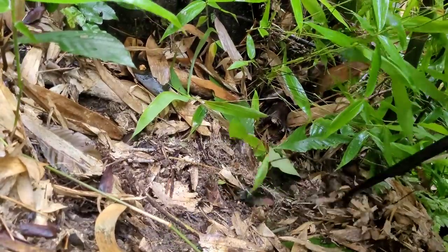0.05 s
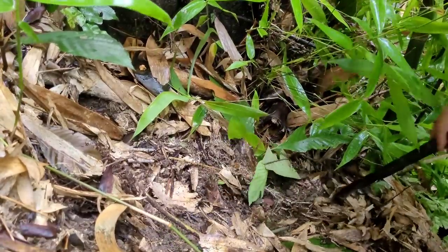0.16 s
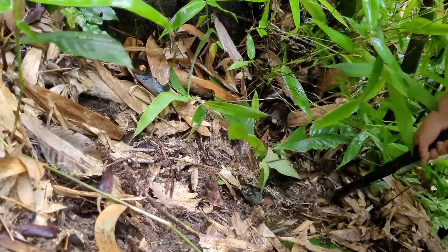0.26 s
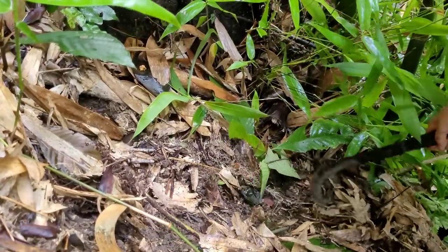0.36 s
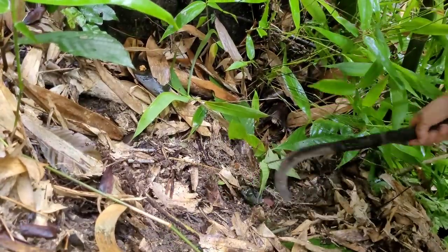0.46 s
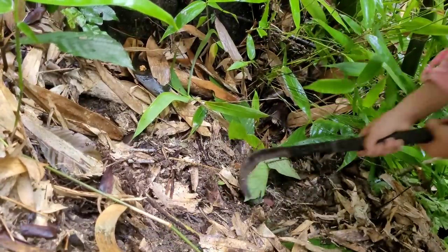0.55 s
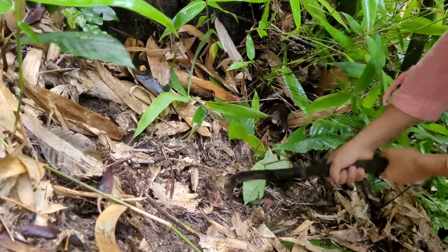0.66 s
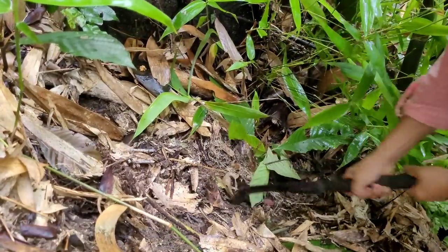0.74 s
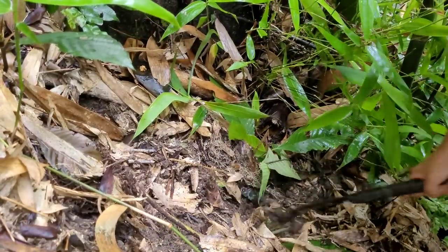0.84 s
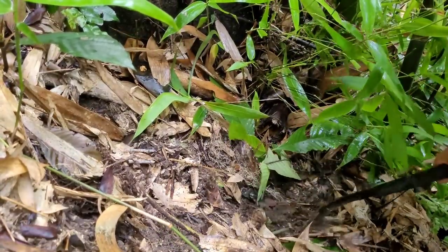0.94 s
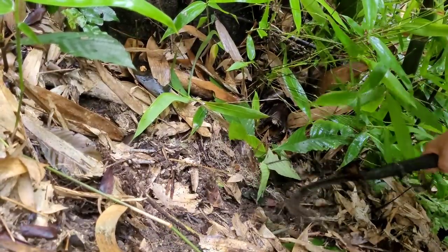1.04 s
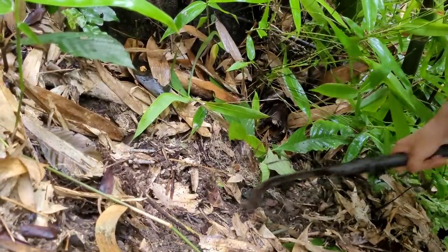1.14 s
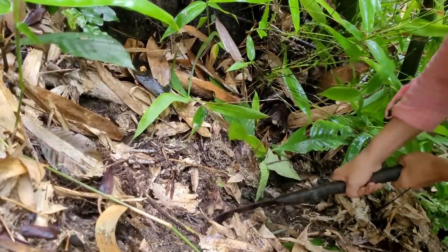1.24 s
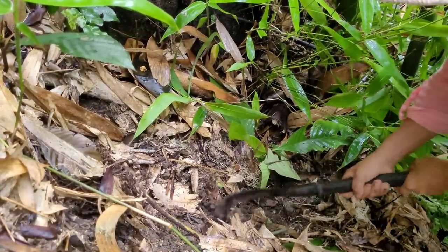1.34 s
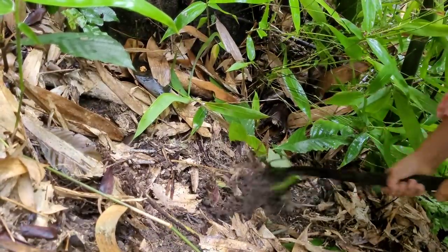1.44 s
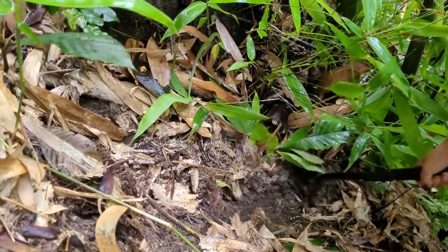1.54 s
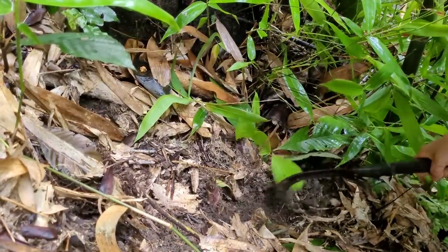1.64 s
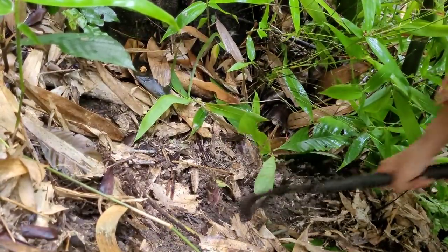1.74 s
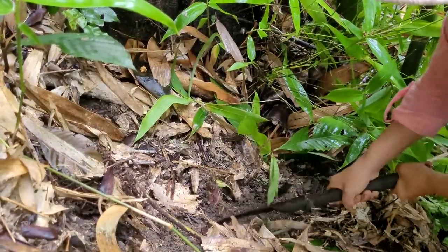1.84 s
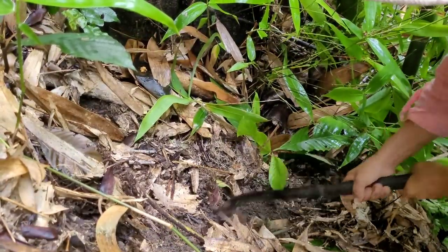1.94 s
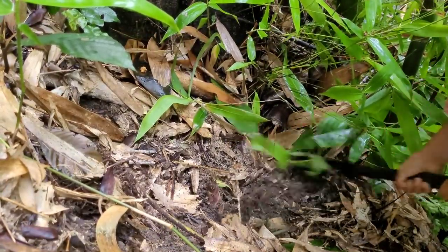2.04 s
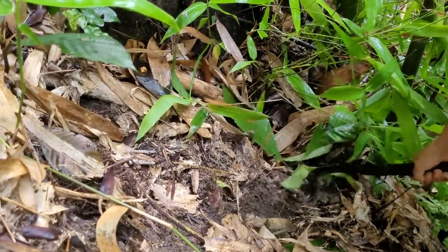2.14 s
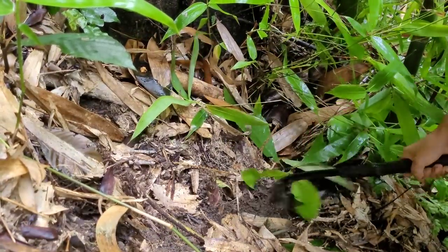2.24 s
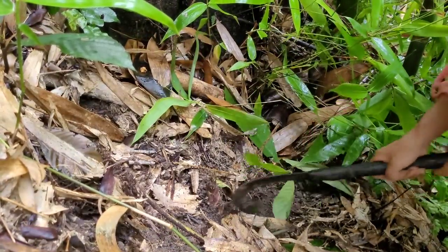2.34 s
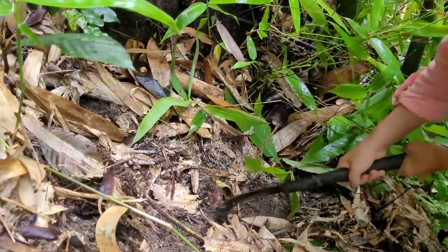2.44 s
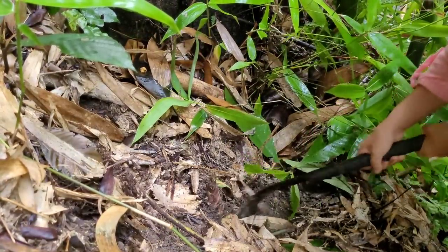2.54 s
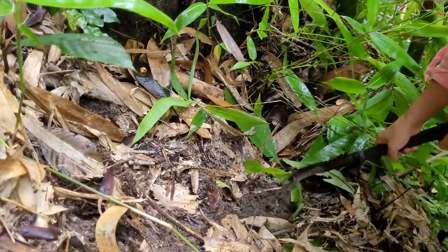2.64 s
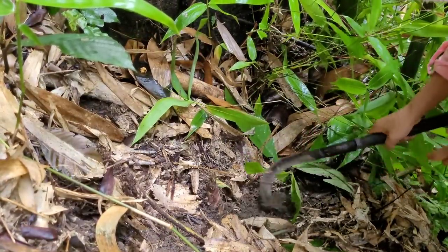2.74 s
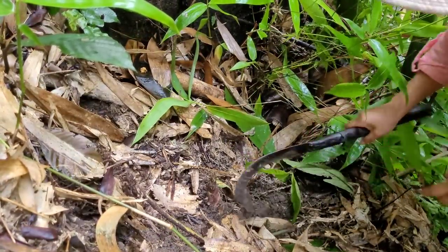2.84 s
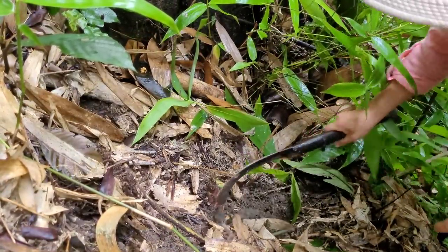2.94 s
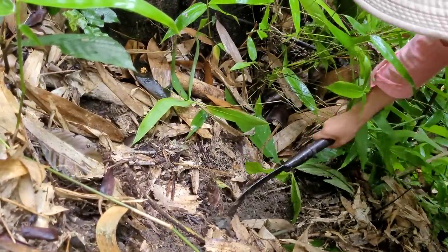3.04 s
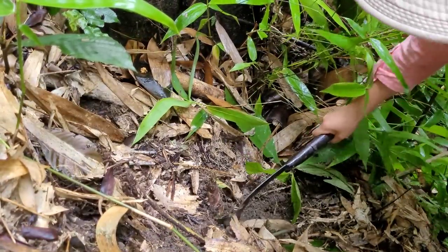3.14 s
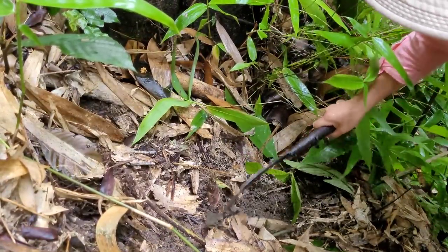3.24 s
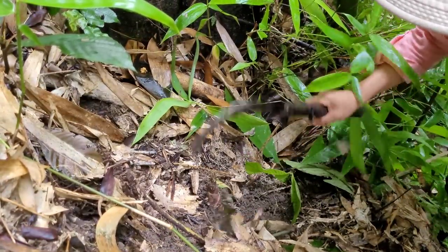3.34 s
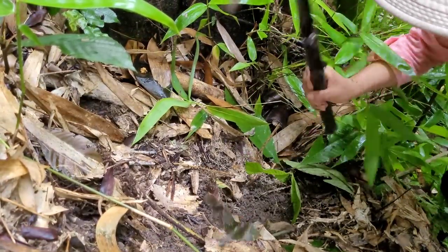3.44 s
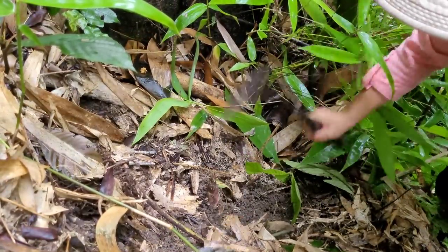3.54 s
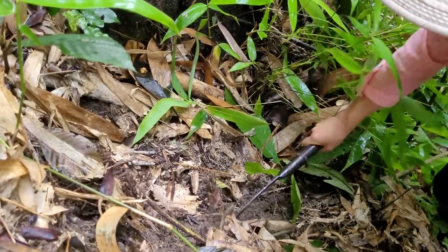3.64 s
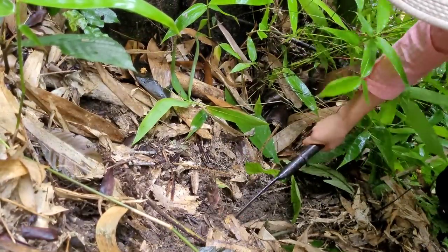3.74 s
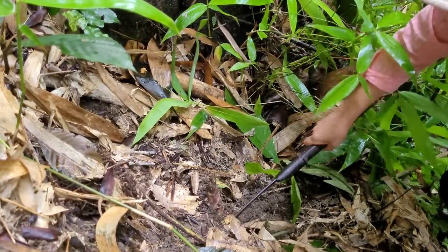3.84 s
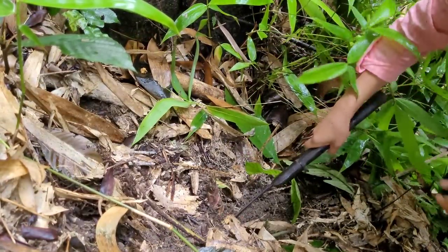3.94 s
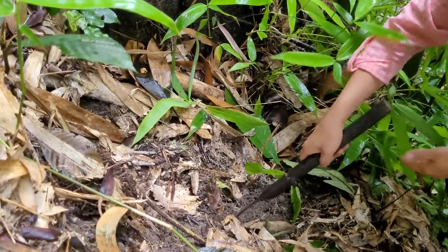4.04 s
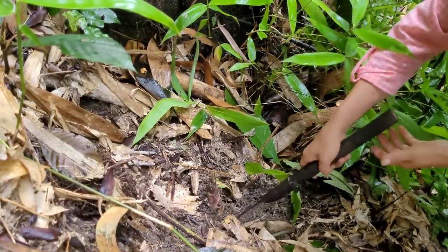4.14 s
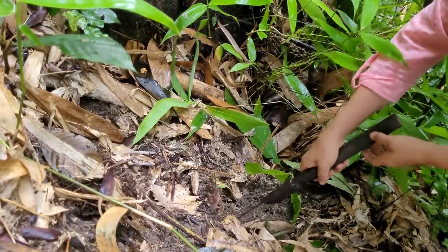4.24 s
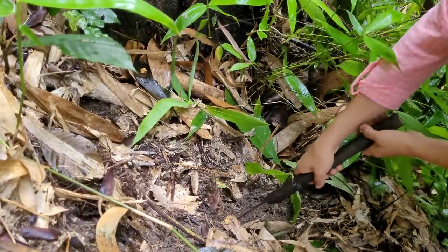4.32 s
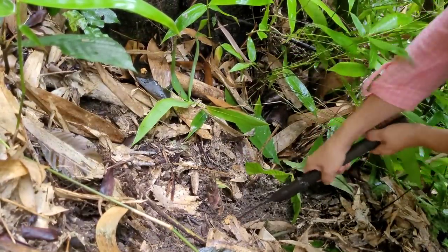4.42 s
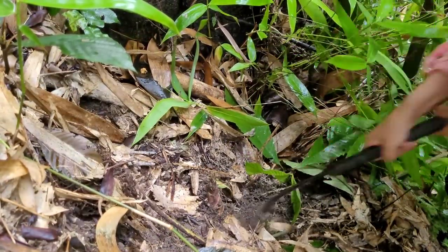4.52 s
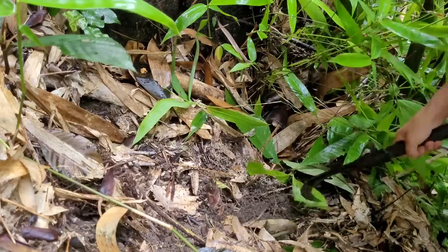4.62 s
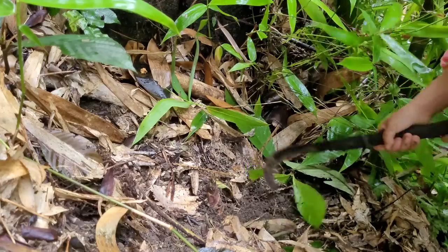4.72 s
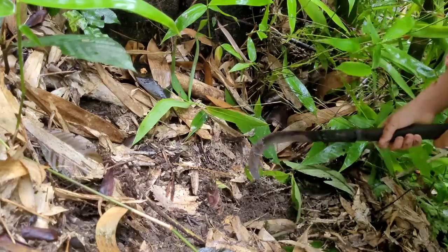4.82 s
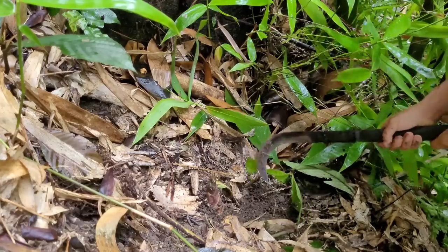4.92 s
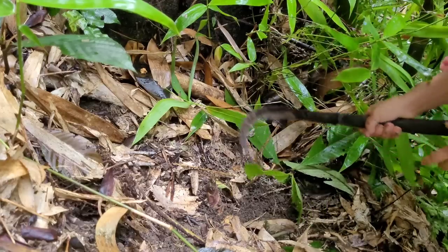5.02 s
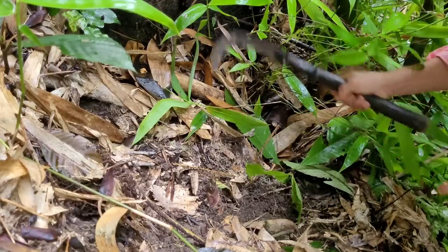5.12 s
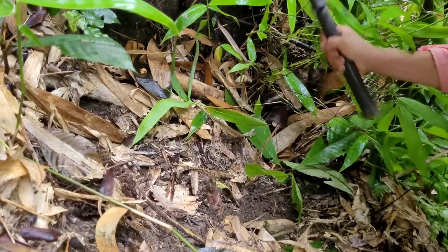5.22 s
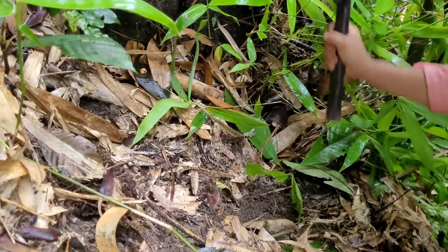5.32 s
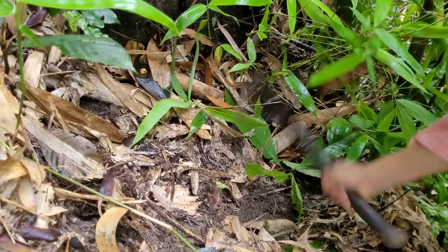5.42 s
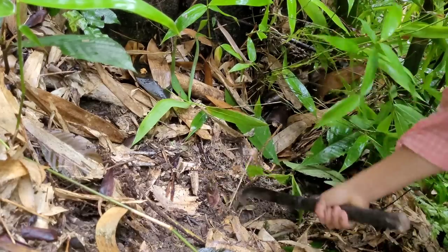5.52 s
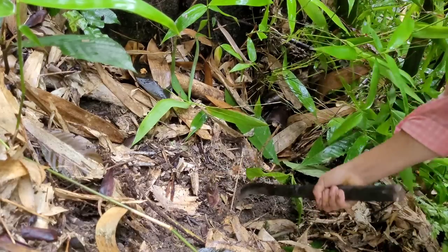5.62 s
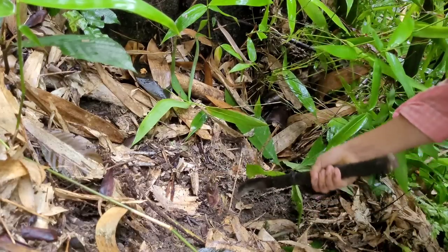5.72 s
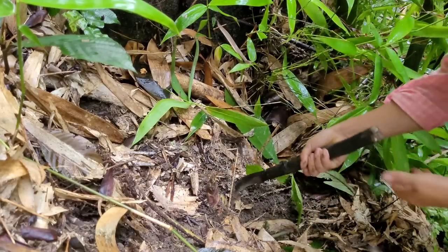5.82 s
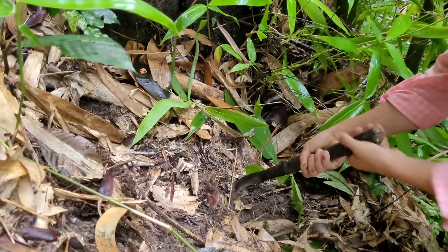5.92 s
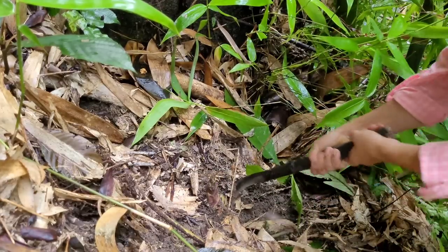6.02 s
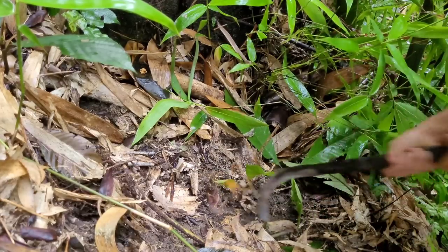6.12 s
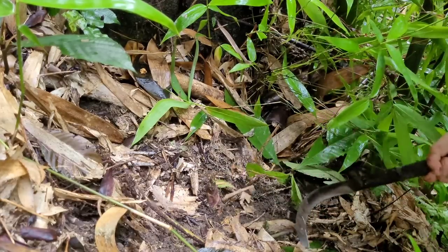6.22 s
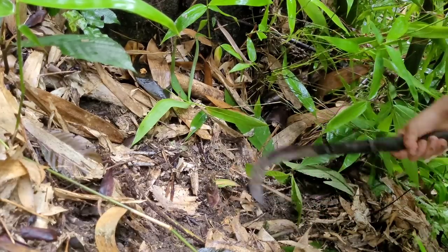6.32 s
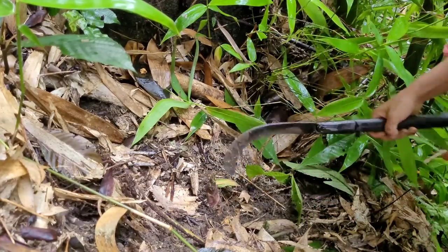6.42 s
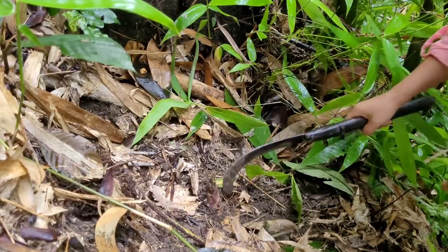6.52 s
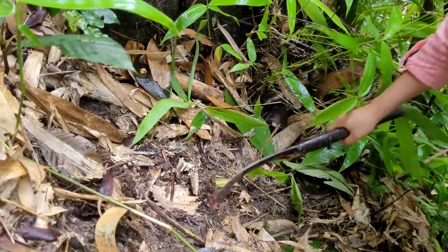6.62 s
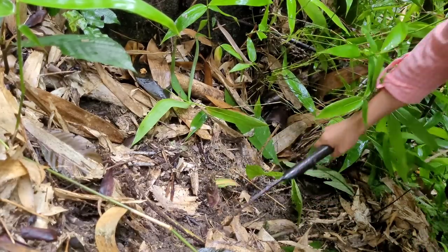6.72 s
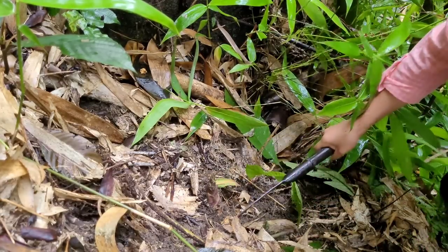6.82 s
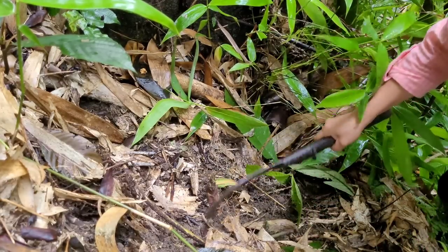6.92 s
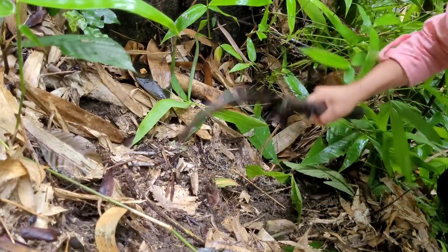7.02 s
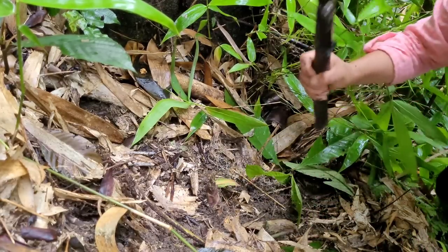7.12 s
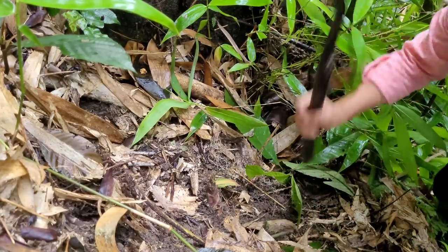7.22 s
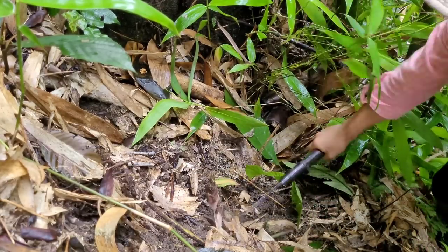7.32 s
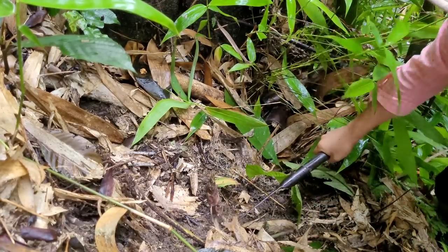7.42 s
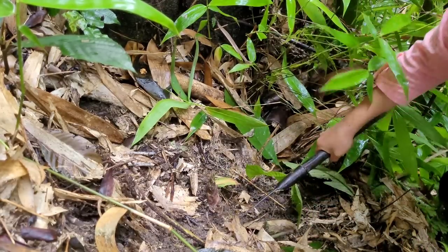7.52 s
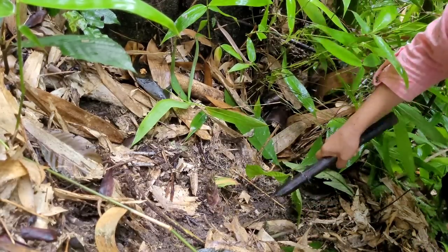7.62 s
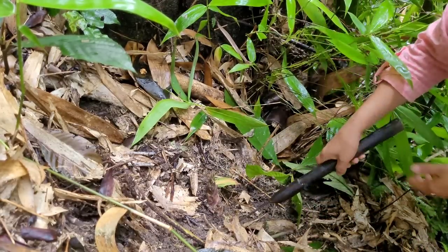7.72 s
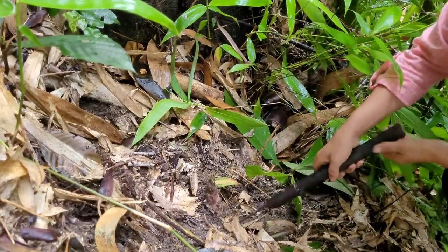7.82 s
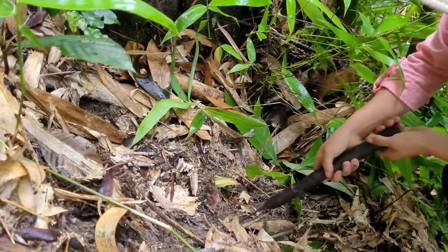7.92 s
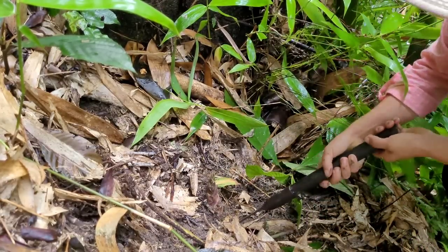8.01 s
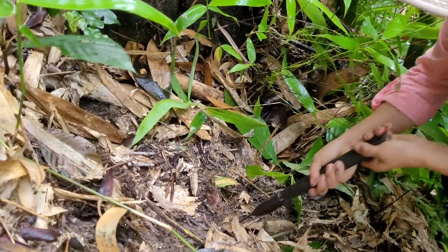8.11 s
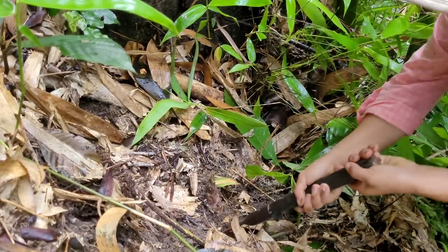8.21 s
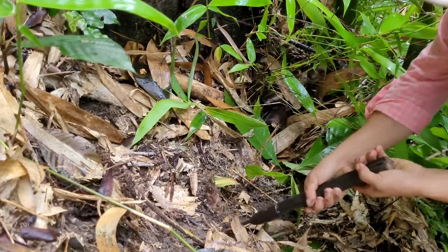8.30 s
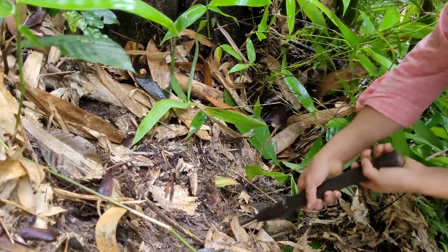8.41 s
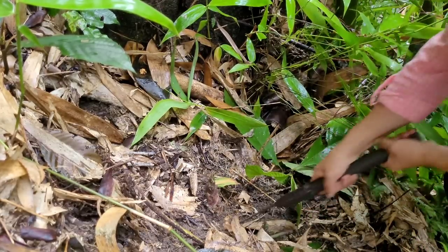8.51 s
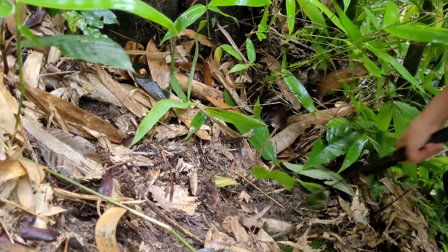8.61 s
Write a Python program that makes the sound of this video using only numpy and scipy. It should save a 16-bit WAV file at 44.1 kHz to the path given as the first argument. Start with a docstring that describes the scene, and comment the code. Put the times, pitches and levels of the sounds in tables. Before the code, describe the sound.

Close, dry outdoor sound of a hooked machete in damp soil and leaf litter. From 0 to 1.7 s there are light rustling cuts, a cluster of twig snaps and a dull handle bump near 0.7-0.9, and small scrapes at 1.3 and 1.6. Soft earthy chops thump at 1.9 and 2.5, with a sharp snap and rake at 2.1. Firmer blows follow at 3.1 and 3.7, then a crackling drag around 4 and a slower gritty cut at 4.5. After a lull and a bump at 5.3, a hard bright crunch lands at 5.5. Duller cuts come at 6.1 and 6.8 with faint steel taps; the heaviest crunch is at 7.4. Gritty drags and snaps run 7.6-8.3, with a last soft cut at 8.6. Throughout, thin high insect hiss and low forest rush stay faint; distant bird whistles glide near 3.5-4 and, weaker, at 6.4.

```python
"""Machete in forest soil

A hooked machete chops into damp soil close by: grit crunches, roots knock and the ground thumps.
Between blows it lightly cuts and rakes crackling leaf litter, twigs snap and the handle bumps. All this
is noise shaped by forces, struck resonances and damped modes. Behind it insects hiss in a high band of
noise, the forest rushes low and a far bird whistles in gliding tones smeared by a dense echo.
"""
import sys
import numpy as np
from scipy import signal
from scipy.fft import rfft, irfft, next_fast_len
from scipy.io import wavfile

SR = 44100
rng = np.random.default_rng(int(sys.argv[2]) if len(sys.argv) > 2 else 0)


def store_pcm(level_fs):
    """Save levels as 16-bit WAV."""
    pcm = np.round(np.clip(level_fs, -1, 1) * 32767).astype(np.int16)
    wavfile.write(sys.argv[1], SR, np.atleast_2d(pcm).T)


N = 381906
TIME = np.arange(N) / SR   # s

# near sounds, left-right correlation, clipped to -0.9..0.999: (frequency [Hz], correlation [1])
NEAR_LIKENESS = [(60, -0.1), (130, 2.1), (250, 0.7), (500, 1), (1000, 0.74), (2000, 0.5), (5000, -0.08),
                 (15000, 0.17)]
# near sounds, lean to the left: (frequency [Hz], left minus right [dB])
NEAR_BALANCE = [(200, 0), (550, -1), (780, -4), (1000, 2.5), (1250, -5.5), (2100, 0), (3000, 1), (4600, 1),
                (7000, -5), (10000, 2.5), (14000, 2)]
# colour of clods: (frequency [Hz], relative density [dB])
CLOD_SPECTRUM = [(110, -1), (210, -10), (450, -1.5), (750, 2), (1000, -15), (1600, -11), (3000, -85)]
# colour of grit: (frequency [Hz], relative density [dB])
GRIT_SPECTRUM = [(450, -57), (850, -12.5), (1050, 4.5), (1250, -6), (1750, 5.5), (2600, -2), (3500, -6),
                 (5000, -6), (9000, -24)]
# colour of dry leaves: (frequency [Hz], relative density [dB])
LEAF_SPECTRUM = [(800, -48), (2000, -3.5), (3000, -4.5), (4500, 2.5), (7500, 4), (11000, 3.5), (14500, 1.5),
                 (16000, -1)]
# blows of the blade: (time [s], entry [s], travel [s], stop t60 [s], clod level [dB], grit level [dB],
#   leaf level [dB], leaf top-treble gain [dB], ring pitch [Hz], ring level [dB], heave level [dB],
#   thud level [dB], root knock mid pitch [Hz], root knock level [dB])
BLOWS = [(1.872, 0.0067, 0.028, 0.034, -33, -35, -31.5, -1.5, 780, -35, -27, -22, 483, -25),
         (2.514, 0.0019, 0.0044, 0.024, -30, -40, -35.5, -1, 1630, -36, -28, -18.5, 357, -26),
         (3.124, 0.002, 0.0027, 0.025, -24, -29, -25, 4.5, 1040, -29, -30.5, -25, 275, -34),
         (3.6797, 0.0032, 0.0055, 0.04, -19, -17.5, -13.5, -1, 1970, -33, -25.5, -21, 328, -15.5),
         (4.546, .011, .02, 0.065, -30, -23.5, -24, 2.5, 980, -35, -33.5, -82, 690, -40),
         (5.5427, 0.001, 0.005, 0.0073, -16.5, -15.5, -7, 7.5, 1740, -20, -22.5, -28, 377, -13.5),
         (6.146, 0.018, 0.029, 0.068, -33, -29.5, -20.5, -3.5, 780, -45, -40.5, -41.5, 782, -28.5),
         (6.829, 0.0047, 0.0079, 0.051, -35, -39, -34, -7, 985, -41, -40.5, -42, 476, -26.5),
         (7.376, 0.002, 0.0062, 0.062, -15.5, -10, -11, -2, 1660, -41, -22, -24, 201, -26),
         (8.602, 0.012, .016, .11, -34, -26, -23.5, -5.5, 1350, -34, -41, -63.5, 475, -45)]


def chops(sag_db=7.0, ring_q=28.0, sheen_hz=9000):
    """The edge enters the litter, slows through clods and grit, and stops; crumbs fall after it."""
    texture = fractures(per_s=2700, spread_db=0.0, ring_s=0.00054, bed=0.66)
    clod = near_noise(CLOD_SPECTRUM, texture)
    grit = near_noise(GRIT_SPECTRUM, texture)
    leaf = near_noise(LEAF_SPECTRUM, texture)
    sheen = signal.sosfiltfilt(signal.butter(2, sheen_hz, "high", fs=SR, output="sos"), leaf)
    crumbs = fractures(per_s=400, spread_db=2.0, ring_s=.001, bed=.3)
    out = np.zeros((2, N))
    for s, entry_s, travel_s, t60, clod_db, grit_db, leaf_db, sheen_db, ring_hz, ring_db, *_ in BLOWS:
        span = slice(int((s - .08) * SR), int((s + .25) * SR))
        t = TIME[span] - s
        entry_db = 20 * np.minimum(t, 0) / entry_s
        slowing_db = sag_db * np.clip(t / travel_s, 0, 1)
        stop_db = 60 * np.maximum(t - travel_s, 0) / t60
        force = from_db(entry_db - slowing_db - stop_db)
        force = force * np.where(t > travel_s, crumbs[span], 1)
        # the buried blade rings at a pitch set by how the soil grips it
        ring = signal.lfilter(*signal.iirpeak(ring_hz, ring_q, fs=SR), grit[:, span])
        # drier leaves tear with more of the highest treble
        tear = leaf[:, span] + (from_db(sheen_db) - 1) * sheen[:, span]
        layers = [(clod[:, span], clod_db), (grit[:, span], grit_db), (ring, ring_db), (tear, leaf_db)]
        for sound, level_db in layers:
            out[:, span] += driven(sound, force) * from_db(level_db)
    return out


# heave, then thud of the ground: (mid pitch [Hz], swell [s])
GROUND_MODES = [(78, 0.0097), (128, 0.006)]
# colour of moving earth: (frequency [Hz], relative density [dB])
EARTH_SPECTRUM = [(20, -33.5), (33, -19.5), (50, 3.5), (85, -5.5), (130, -7.5), (220, -15), (400, -24),
                  (900, -39)]
# left-right correlation of moving earth: (frequency [Hz], correlation [1])
EARTH_LIKENESS = [(30, .9), (100, .96)]
GROUND_LAG_S = 0.00074   # the earth gives just after the edge bites
SETTLE_DB, SETTLE_T60_S = -2, 0.18   # level relative to the heave


def ground(knock_swell_s=0.0032, droop=0.13, knock_droop=0.097, settle_start_s=.012):
    """Springy earth heaves under each blow while a root knocks, then the loose soil settles."""
    out = np.zeros((2, N))
    earth = noise(EARTH_SPECTRUM, EARTH_LIKENESS, NEAR_BALANCE)
    for s, *_, heave_db, thud_db, knock_hz, knock_db in BLOWS:
        heave = thump(*GROUND_MODES[0], heave_db, droop)
        thud = thump(*GROUND_MODES[1], thud_db, droop)
        add(out, s + GROUND_LAG_S, heave - thud)
        add(out, s + GROUND_LAG_S, thump(knock_hz, knock_swell_s, knock_db, knock_droop))
        settling = swell(s + settle_start_s, settle_start_s / 2, SETTLE_T60_S)
        out += from_db(heave_db + SETTLE_DB) * driven(earth, settling)
    return out


# stones catching on the edge: (frequency [Hz], relative density [dB])
CATCH_SPECTRUM = [(250, -33), (500, -2.5), (800, -4.5), (1100, -3), (1800, -3), (3000, -8.5), (6000, -10)]
KNOCK_DB = -3   # crumb knocks, relative to the soil


def raking(leaf_trim_db=1.5, blade_db=-4.0):
    """Crumbs and dry leaves crackle against the moving blade, and stones catching on it make it ring."""
    soil, leaf = litter(fractures(per_s=500, spread_db=3.0, ring_s=.001, bed=.5))
    catches = near_noise(CATCH_SPECTRUM, fractures(per_s=130, spread_db=2.2, ring_s=.001, bed=.05))
    ringing = from_db(blade_db) * blade_ring(catches)
    soil = rms_one(soil + ringing + from_db(KNOCK_DB) * crumb_knocks())
    soil_force, leaf_force = stirring()
    return soil * soil_force + leaf * leaf_force * from_db(leaf_trim_db)


# light cuts and sweeps through the litter, leaf level before trim:
# (peak time [s], swell [s], fade t60 [s], soil level [dB], leaf level [dB])
CUTS_AND_SWEEPS = [(.02, 0.3, 0.57, -45, -46), (.18, 0.037, 0.23, -45, -44), (.3, .1, 1.2, -57.5, -55),
                   (.732, 0.096, 0.33, -41, -43.5), (.825, 0.085, 0.51, -44, -42),
                   (0.894, 0.096, 0.51, -44, -45), (1.1, .15, 3.2, -60, -60), (1.3, 0.019, 0.1, -36.5, -35),
                   (1.47, 0.12, 0.16, -78, -53), (1.57, 0.094, 0.36, -38.5, -41),
                   (2.06, 0.034, 0.08, -49, -42.5), (2.136, 0.037, 0.38, -31.5, -36.5),
                   (2.594, 0.035, 0.05, -60, -44), (2.646, 0.025, 0.38, -50, -49.5),
                   (2.89, 0.044, 1.2, -58, -48.5), (3.46, 0.09, 1.1, -66, -52.5),
                   (5.03, 0.094, 1.5, -65, -61), (5.301, 0.085, 0.26, -46.5, -43),
                   (5.49, 0.24, 0.35, -56.5, -54.5), (5.81, 0.14, 0.35, -58, -57),
                   (6.64, 0.048, 0.14, -51, -56.5), (6.75, 0.18, 1.6, -65, -56.5),
                   (7.044, 0.043, 0.22, -54.5, -43), (8.0, 0.034, 0.62, -48, -49),
                   (8.51, 0.072, 0.18, -53.5, -56)]
# drags through the soil, leaf level before trim:
# (start [s], stop [s], soil level [dB], leaf level [dB], unused [dB], unused [dB])
DRAGS = [(3.907, 4.137, -40.5, -40, -43, -58), (7.55, 7.877, -46, -49, -48, -36),
         (8.129, 8.255, -34, -36, -34, -60)]
# crumbs raining after a blow: leaf level before trim at mean grit, share of the grit's swing
SHOWER_DB, SHOWER_FOLLOWS, SHOWER_T60_S = -53, 0.32, 1
SHOWER_SOIL_DB = -1.5   # relative to SHOWER_DB


def stirring(shower_delay_s=0.017):
    """How hard light cuts, sweeps, drags and the crumbs raining after each blow stir soil and leaves."""
    moves = []
    for s, rise_s, t60, soil_db, leaf_db in CUTS_AND_SWEEPS:
        moves.append((swell(s, rise_s, t60), soil_db, leaf_db))
    for start_s, stop_s, soil_db, leaf_db, *_ in DRAGS:
        moves.append((effort(start_s, stop_s), soil_db, leaf_db))
    times, _, _, _, _, grit_db, *_ = np.transpose(BLOWS)
    showers_db = SHOWER_DB + SHOWER_FOLLOWS * (grit_db - grit_db.mean())
    for s, db in zip(times, showers_db):
        shower = swell(s + shower_delay_s, shower_delay_s / 2, SHOWER_T60_S)
        moves.append((shower, db + SHOWER_SOIL_DB, db))
    soil = np.sqrt(sum((shape * from_db(db)) ** 2 for shape, db, _ in moves))
    leaf = np.sqrt(sum((shape * from_db(db)) ** 2 for shape, _, db in moves))
    return soil, leaf


DRAG_BUILD_SHARE, DRAG_BUILD_DB, DRAG_RELEASE_T60_S = 0.78, 10.5, 0.082
DRAG_GRIP_S = 0.019   # the edge takes hold just before the pull


def effort(start_s, stop_s):
    """Force of a drag: it builds, holds, and falls quickly when the earth lets go."""
    built = np.clip((TIME - start_s) / (DRAG_BUILD_SHARE * (stop_s - start_s)), 0, 1)
    release_db = 60 * np.clip(TIME - stop_s, 0, 1) / DRAG_RELEASE_T60_S
    grip = np.clip((TIME - start_s) / DRAG_GRIP_S + 1, 0, 1)
    return from_db(DRAG_BUILD_DB * (built - 1) - release_db) * grip


KNOCKS_PER_S, KNOCK_SPREAD_DB = 260, 3.5
KNOCK_CYCLES = 14   # cycles to fall 60 dB
KNOCK_LOW_HZ, KNOCK_HIGH_HZ = 518, 3100


def crumb_knocks(count=18):
    """Crumbs and splinters knock together, each a short damped ring with its own size, pitch and place."""
    sizes = from_db(KNOCK_SPREAD_DB * np.minimum(rng.exponential(1, N), 3))
    sizes = (rng.random(N) < KNOCKS_PER_S / SR) * sizes
    clicks = sizes * (1 + .4 * rng.standard_normal((2, N)))
    dealt = rng.integers(0, count, N)   # which pitch each click gets
    out = 0
    for k, hz in enumerate(np.geomspace(KNOCK_LOW_HZ, KNOCK_HIGH_HZ, count)):
        radius = from_db(-60 * hz / (KNOCK_CYCLES * SR))
        turn = radius * np.cos(2 * np.pi * hz / SR)
        struck = clicks * (dealt == k) + 1e-18
        out = out + signal.lfilter([1, -turn], [1, -2 * turn, radius ** 2], struck)
    return rms_one(out)


# stalks and twigs snapping: (time [s], body level [dB], crack level [dB])
SNAPS = [(0.082, -40, -46), (.43, -68.5, -45), (0.722, -41, -36), (.811, -35.5, -37), (0.85, -37, -38),
         (.885, -38, -33), (0.897, -33.5, -29), (0.938, -55, -39), (1.148, -50.5, -39), (1.212, -43, -47),
         (1.292, -43, -39), (2.012, -41.5, -44), (2.1155, -31.5, -14.5), (2.348, -55, -39),
         (3.66, -38, -34), (3.668, -28, -31), (3.88, -46, -37), (3.903, -40, -41), (3.963, -42, -40),
         (3.97, -44, -46), (3.993, -38, -46), (4.014, -34, -38), (4.059, -29, -37), (4.518, -55, -39),
         (4.566, -33, -22), (4.59, -58, -30.5), (5.436, -40.5, -59), (5.538, -26.5, -23), (5.754, -57, -41),
         (5.809, -41, -36.5), (5.817, -41, -38.5), (6.184, -26.5, -20.5), (7.388, -19.5, -14),
         (7.702, -35.5, -42), (7.804, -39, -42), (7.977, -44, -42), (7.995, -36, -37), (8.024, -36, -37),
         (8.05, -37, -38), (8.158, -29, -36)]


def snaps(t60=0.031):
    """A stalk gives at once and its splinters die away."""
    soil, leaf = litter(fractures(per_s=3000, spread_db=2.5, ring_s=.0003, bed=.4))
    out = np.zeros((2, N))
    decay = from_db(-60 * TIME[:SR // 8] / t60)
    for s, body_db, crack_db in SNAPS:
        span = slice(int(s * SR), int(s * SR) + len(decay))
        out[:, span] += driven(soil[:, span], decay) * from_db(body_db)
        out[:, span] += driven(leaf[:, span], decay) * from_db(crack_db)
    return out


# colour of soil: (frequency [Hz], relative density [dB])
SOIL_SPECTRUM = [(100, 5), (220, 8.5), (400, 5.5), (750, -7), (1200, -1.5), (1900, -11), (2800, -9.5),
                 (4500, -2.5), (9000, -51)]


def litter(texture):
    """Dull soil and bright dry leaf break together; the soil also sets the blade ringing."""
    soil = near_noise(SOIL_SPECTRUM, texture)
    leaf = near_noise(LEAF_SPECTRUM, texture)
    return rms_one(soil + blade_ring(soil)), leaf


# resonances of the blade and the cut it stands in: (frequency [Hz], width [Hz], relative level [dB])
BLADE_MODES = [(507, 77, -5), (765, 12, 11.5), (1060, 70, -1.5), (1440, 290, -4), (1786, 220, -4),
               (1977, 270, 3.5), (2474, 79, 4.5), (2885, 180, 2.5)]


def blade_ring(sound):
    """Blade resonances excited by a sound, at rms 1."""
    ringing = 0
    for hz, width_hz, db in BLADE_MODES:
        ringing = ringing + from_db(db) * signal.lfilter(*signal.iirpeak(hz, hz / width_hz, fs=SR), sound)
    return rms_one(ringing)


# scuffs of shifting weight and levered clods: (time [s], half length [s], level [dB])
SCUFFS = [(0.68, 0.039, -38.5), (0.72, 0.0077, -37.5), (1.562, 0.033, -42.5), (4.05, 0.12, -58.5),
          (5.128, .006, -44), (5.185, 0.021, -44), (5.308, 0.03, -42.5), (8.2, 0.03, -53)]
# colour of a scuff: (frequency [Hz], relative density [dB])
SCUFF_SPECTRUM = [(70, -25), (150, -5), (230, 3), (330, 4.5), (430, -6.5), (540, 4), (660, -10.5),
                  (800, 0.5), (1050, -31), (2000, -54)]
# dull bumps of the handle: (time [s], frequency [Hz], level [dB])
BUMPS = [(.711, 530, -31), (.718, 255, -29), (5.176, 290, -42), (5.294, 336, -30.5)]
# the bare blade tapping a stone or stem: (time [s], level [dB])
TAPS = [(6.828, -31), (6.966, -32.5)]
# modes of a tap: (frequency [Hz], swell [s], relative level [dB])
TAP_MODES = [(1925, 0.0023, -2), (2130, 0.0017, -10), (4200, 0.0005, 0)]


def handling(bump_swell_s=0.0024):
    """Scuffs are noise under bell-shaped pressure; handle bumps and steel taps are damped modes."""
    pressure = sum(from_db(db) * np.exp(-((TIME - s) / half_s) ** 2 / 2) for s, half_s, db in SCUFFS)
    out = pressure * near_noise(SCUFF_SPECTRUM)
    for s, hz, level_db in BUMPS:
        add(out, s, thump(hz, bump_swell_s, level_db))
    for s, level_db in TAPS:
        add(out, s, sum(thump(hz, swell_s, level_db + db) for hz, swell_s, db in TAP_MODES))
    return out


# gliding notes: (time [s], length [s], first pitch [Hz], last pitch [Hz], level before fade and echo [dB])
WHISTLES = [(3.454, 0.17, 4440, 4590, -44), (3.69, 0.25, 4115, 4180, -41.5),
            (3.781, 0.12, 4020, 3100, -36.5), (3.898, .16, 3150, 2950, -44.5),
            (4.322, 0.25, 5020, 5180, -68), (6.346, .06, 3290, 3300, -55.5),
            (6.405, 0.067, 2120, 2060, -52), (6.465, .19, 2980, 2716, -50)]
WHISTLE_FADE_DB = 9.5   # lost in the course of a note


def bird():
    """Thin, hoarse gliding whistles, smeared by the forest."""
    out = np.zeros((1, N))
    wobble = 1 + .02 * drift(600)
    for s, length_s, first_hz, last_hz, level_db in WHISTLES:
        along = np.linspace(0, 1, int(length_s * SR))
        hz = first_hz + (last_hz - first_hz) * np.sin(along * np.pi / 2) ** 2
        phase = 2 * np.pi * np.cumsum(hz * wobble[:len(along)]) / SR
        envelope = from_db(level_db - WHISTLE_FADE_DB * along) * signal.windows.tukey(len(along), .3)
        add(out, s, envelope * np.sin(phase))
    hoarse = out * (1 + .6 * drift(400))
    return .45 * hoarse + trees(hoarse, t60=.36, delay_s=.005, low_hz=800, high_hz=9000)


# far sounds, left-right correlation, clipped to -0.9..0.999: (frequency [Hz], correlation [1])
FAR_LIKENESS = [(60, 1), (130, 0.81), (290, 0.84), (640, -0.24), (1410, -0.22), (3100, -0.1), (6820, 0.099),
                (15000, -0.064)]
# far sounds, lean to the left: (frequency [Hz], left minus right [dB])
FAR_BALANCE = [(60, -1), (380, 1), (700, -4), (4400, -2.5), (7400, -9.5), (9500, 3), (15000, -3)]
# low far rush: (frequency [Hz], relative density [dB])
RUSH_SPECTRUM = [(15, -46.5), (25, -22.5), (55, 2.5), (176, -9.5), (284, 1), (401, -4.5), (450, -10),
                 (553, -7), (606, -10), (894, -14.5), (1950, -20.5), (2090, -26), (2880, -26), (3880, -26),
                 (6000, -34.5), (7800, -59), (13200, -120)]
# faint hiss of the foliage: (frequency [Hz], relative density [dB])
FOLIAGE_SPECTRUM = [(3000, -20), (6000, -3), (9000, 0), (12000, -1), (15500, -7)]
# insect chorus: (frequency [Hz], relative density [dB])
INSECT_SPECTRUM = [(5800, -10), (6500, -19.5), (6780, 0.5), (6950, -8), (7200, 5), (7520, 2.5), (7800, -2),
                   (8200, -15), (9000, -47.5)]


def forest(rush_db=-50.5, foliage_db=-67.5, insect_db=-56.0):
    """Low rush, faint leaf hiss and high insect band: coloured noise, rush and insects drifting in level."""
    rush = from_db(rush_db + 0.28 * drift(21)) * noise(RUSH_SPECTRUM, FAR_LIKENESS, FAR_BALANCE)
    foliage = from_db(foliage_db) * noise(FOLIAGE_SPECTRUM, FAR_LIKENESS, FAR_BALANCE)
    chorus_db = insect_db + .5 * drift(2.47) + 2.0 * drift(54)
    insects = from_db(chorus_db) * noise(INSECT_SPECTRUM, FAR_LIKENESS, FAR_BALANCE)
    return rush + foliage + insects


def trees(x, t60, delay_s, low_hz, high_hz):
    """Sound scattered by leaves and stems: a dense, dying echo of unit energy."""
    t = TIME[:SR]
    echo = rng.standard_normal((2, SR)) * from_db(-60 * t / t60) * (1 - np.exp(-t / delay_s))
    echo = signal.sosfilt(signal.butter(1, [low_hz, high_hz], "band", fs=SR, output="sos"), echo)
    echo = echo / np.sqrt(np.sum(echo ** 2) / 2)
    return signal.fftconvolve(np.atleast_2d(x), echo, axes=1)[:, :N]


def thump(hz, swell_s, level_db, droop=0):
    """A heavily damped mode that swells and dies; yielding earth lets its pitch droop."""
    t = TIME[:SR // 4]
    pitch_hz = hz * (1 + droop * (2 * np.exp(-t / (2 * swell_s)) - 1))
    envelope = t / swell_s * np.exp(1 - t / swell_s)
    return from_db(level_db) * envelope * np.sin(2 * np.pi * np.cumsum(pitch_hz) / SR)


def fractures(per_s, spread_db, ring_s, bed):
    """Envelope of countless tiny breaks of uneven size over a bed of smooth friction."""
    size = from_db(spread_db * np.minimum(rng.exponential(1, N), 4))
    energy = (rng.random(N) < per_s / SR) * size ** 2
    energy = signal.lfilter([1], [1, -np.exp(-1 / (ring_s * SR))], energy + 1e-18)
    return np.sqrt(energy / energy.mean() + bed)


def driven(sound, force):
    """A rough sound under a force, holding the energy of that force however its grains fall."""
    shaped = sound * force
    return shaped * np.sqrt(np.sum(force ** 2) / (np.sum(shaped.mean(axis=0) ** 2) + 1e-20))


def swell(s, rise_s, t60):
    """An envelope that climbs 20 dB in rise_s to its peak at s, then dies away."""
    t = TIME[::16] - s   # held for 16 samples
    level_db = np.minimum(20 * t / rise_s, -60 * t / t60)
    return np.repeat(from_db(np.maximum(level_db, -200)), 16)[:N]


def noise(spectrum, likeness, balance, texture=1):
    """Stereo noise with a given colour, width and lean; the texture is common to both ears."""
    size = next_fast_len(N)
    hz = np.arange(size // 2 + 1) * SR / size
    mid, side = rfft(rng.standard_normal((2, N)) * texture, size)
    alike = np.clip(at_hz(likeness, hz), -.9, .999)
    sign = np.array([[1], [-1]])   # left, right
    pair = mid + sign * side * np.sqrt((1 - alike) / (1 + alike))
    pair = pair * from_db(sign * at_hz(balance, hz) / 2)
    return rms_one(irfft(pair * from_db(at_hz(spectrum, hz)), size)[:, :N])


def near_noise(spectrum, texture=1):
    """Noise with the width and lean of the close work."""
    return noise(spectrum, NEAR_LIKENESS, NEAR_BALANCE, texture)


def drift(rate_hz):
    """Random line through normal knots of spread 1, rate_hz knots a second."""
    knots = rng.standard_normal(4096)
    return np.interp(TIME * rate_hz, np.arange(len(knots)), knots)


def at_hz(points, hz):
    """Read a spectrum on a log-frequency axis."""
    where, value = np.transpose(points)
    return np.interp(np.log(hz + 1), np.log(where), value)


def rms_one(x):
    """Scale so that the middle of the two channels has rms 1."""
    return x / np.sqrt(np.mean(np.atleast_2d(x).mean(axis=0) ** 2) + 1e-20)


def from_db(db):
    """Decibels to gain."""
    return 10 ** (np.asarray(db) / 20)


def add(out, s, sound):
    """Mix a sound in at a time."""
    start = max(round(s * SR), 0)
    part = out[:, start:start + sound.shape[-1]]
    part += sound[..., :part.shape[1]]


def scene():
    """The work close by, its scatter from the undergrowth and canopy, and the forest behind."""
    work = chops() + snaps() + raking()
    undergrowth = from_db(-13) * trees(work, t60=0.035, delay_s=.006, low_hz=295, high_hz=13900)
    # leaves throw back mostly the short waves
    treble = signal.sosfilt(signal.butter(2, 2300, "high", fs=SR, output="sos"), work)
    canopy = from_db(-15.0) * trees(treble, t60=0.22, delay_s=0.0033, low_hz=910, high_hz=11400)
    return work + undergrowth + canopy + ground() + handling() + bird() + forest()


CUTOFF_HZ = 15600


def record(dry):
    """The deepest bass is lost, the hardest peaks overload and the top is cut."""
    dry = signal.sosfilt(signal.butter(2, 34, "high", fs=SR, output="sos"), dry)
    top_cut = signal.ellip(10, .2, 70, CUTOFF_HZ, fs=SR, output="sos")
    return signal.sosfilt(top_cut, np.clip(dry, -1, 1))


dry = scene()
out = record(dry)
store_pcm(out)
```